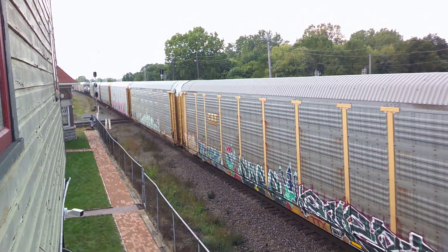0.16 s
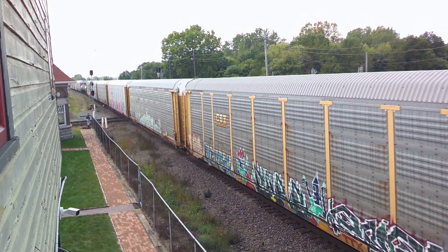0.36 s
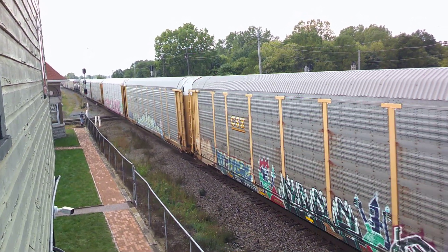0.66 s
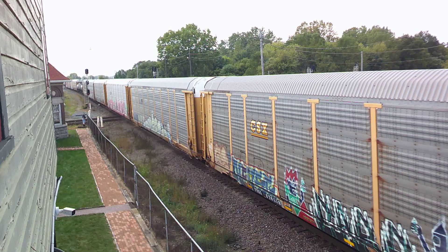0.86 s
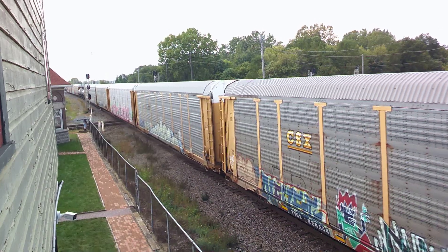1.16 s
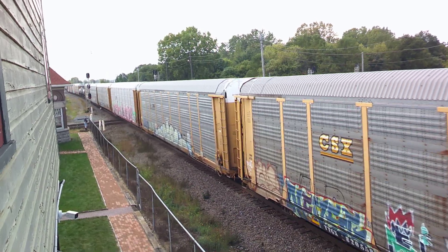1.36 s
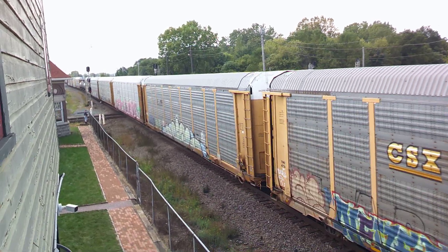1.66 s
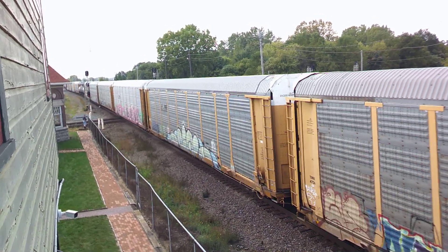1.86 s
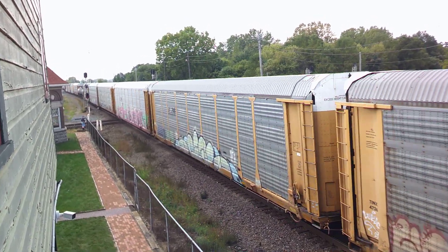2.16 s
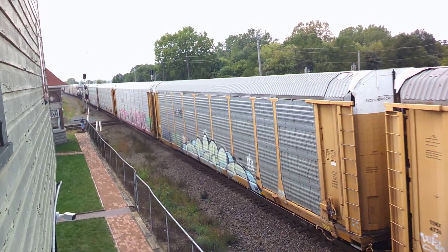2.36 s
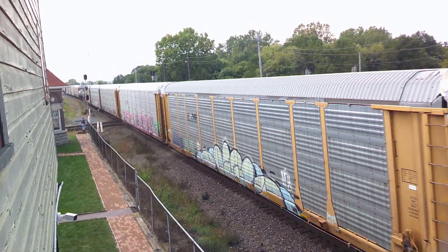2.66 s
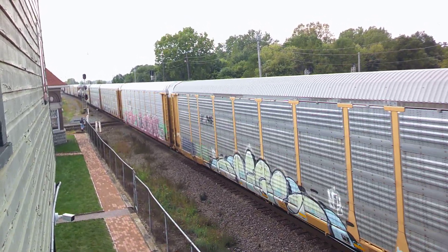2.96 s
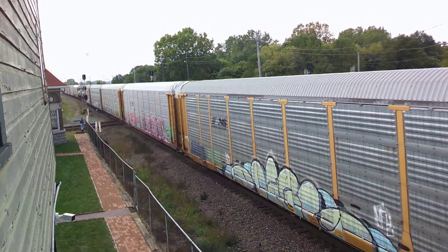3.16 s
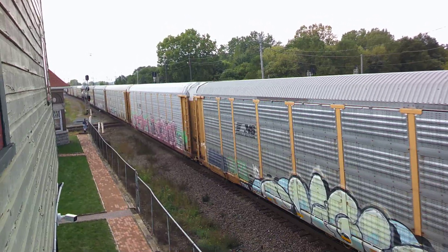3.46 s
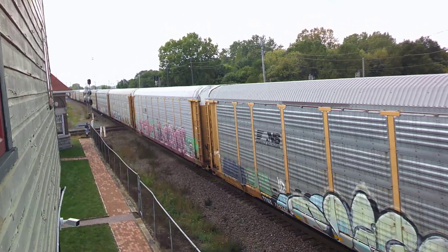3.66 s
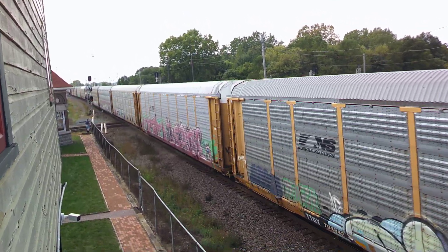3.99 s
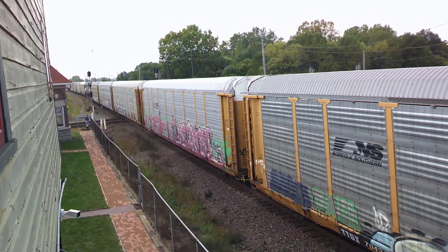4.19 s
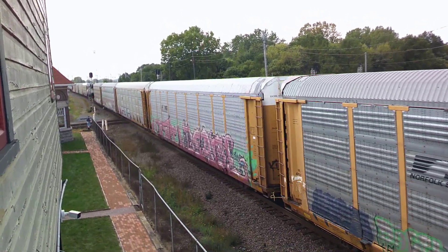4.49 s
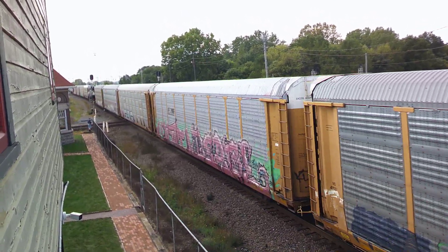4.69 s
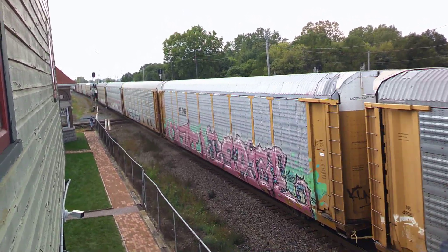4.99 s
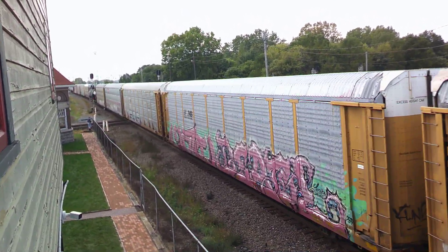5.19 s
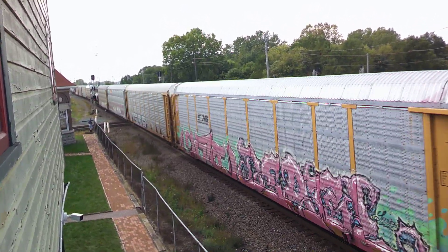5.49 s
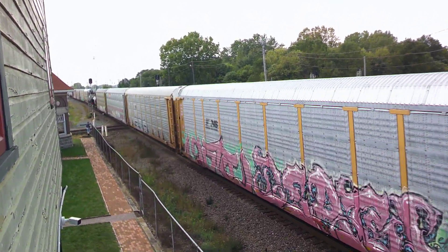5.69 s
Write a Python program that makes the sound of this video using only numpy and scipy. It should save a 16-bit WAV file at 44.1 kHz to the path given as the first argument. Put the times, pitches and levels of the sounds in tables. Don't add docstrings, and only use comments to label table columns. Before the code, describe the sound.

Loud, hard steel wheel blows come in uneven rhythmic bursts, ringing and rattling, with quieter clicks and rolling rumble in the gaps between bogies.

```python
import sys
import numpy as np
from scipy import signal
from scipy.fft import rfft, irfft
from scipy.io import wavfile
from scipy.ndimage import uniform_filter1d

SR = 44100
rng = np.random.default_rng(int(sys.argv[2]) if len(sys.argv) > 2 else 0)


def persist_wave(psi):
    counts = np.round(np.clip(psi, -1, 1) * 32767).astype(np.int16)
    wavfile.write(sys.argv[1], SR, np.atleast_2d(counts).T)


def elevation(decibels):
    levels = np.asarray(decibels, float)
    return 10 ** (levels / 20)


N = 257525
TIME = np.arange(N) / SR


def unit(x):
    return x / np.sqrt(np.mean(x ** 2))


def colour(x, points):
    hz, db = np.transpose(points)
    size = 2 ** 12
    grid_hz = np.maximum(np.arange(size // 2 + 1) * SR / size, 1)
    curve_db = np.interp(np.log(grid_hz), np.log(hz), db)
    cepstrum = irfft(np.log(elevation(curve_db)))
    cepstrum[1:size // 2] *= 2
    cepstrum[size // 2 + 1:] = 0
    response = irfft(np.exp(rfft(cepstrum)))
    response = response / np.sqrt(np.sum(response ** 2))
    return signal.fftconvolve(x, response)[:len(x)]


def walk(rate):
    k = int(SR / rate)
    steps = np.repeat(rng.standard_normal(N // k + 1), k)
    return unit(uniform_filter1d(uniform_filter1d(steps, k), k)[:N])


def knocks(spread_db, per_s):
    k = int(SR / per_s)
    size = elevation(spread_db * np.minimum(rng.exponential(size=N // k + 1), 2.5))
    loudness = uniform_filter1d(np.repeat(size, k)[:N], k)
    return unit(rng.standard_normal(N) * loudness)


def ring(x, hz, t60):
    pole = np.exp(2j * np.pi * hz / SR - np.log(1000) / (max(t60, .01) * SR))
    return signal.lfilter([1], [1, -pole], x).imag * np.sqrt(2 * (1 - abs(pole) ** 2))


def strikes():
    # time in seconds, clank level in dB, thud in dB above clank, wheel note in Hz,
    # trailing wheel in dB above the first.
    near_track = [(0.0144, -10, 0.5, 634, 11.5), (1.046, -5.5, -0.5, 516, 2.5),
                  (1.1861, -7.5, 6.5, 481, 3.5), (1.3768, 3.5, -9.5, 728, -13),
                  (1.684, -8.5, 1.5, 726, 3.5), (1.8381, 2, -1, 237, -4.5), (1.99, -2.5, 0, 475, -4.5),
                  (3.5411, -5, -2, 480, 1.5), (3.685, -6.5, 1.5, 670, 6.5), (3.836, -6.5, 2, 467, 8.5),
                  (4.395, -7, 4.5, 638, -1), (4.533, -5.5, 2.5, 262, 6), (4.6981, -3, 4, 270, -9),
                  (5.8219, -16, 3, 298, -10)]
    # [s, dB, dB, Hz, dB].
    far_track = [(0.0813, -22, -1.5, 439, -7.5), (0.1344, 0.5, -8, 493, -15.5),
                 (0.272, -5.5, 3.5, 328, 2.5), (0.428, -11.5, 5, 349, 3.5), (1.2514, -2, 2, 250, -10),
                 (1.462, -4.5, 1.5, 713, -8.5), (1.604, -4, 2.5, 490, 2), (2.0933, -11, 9.5, 480, -4.5),
                 (2.2308, -2.5, 2.5, 584, -2), (2.3899, -10, 8.5, 188, -17), (2.454, -19.5, 3, 320, 7),
                 (3.9406, -11.5, 1.5, 440, 3.5), (4.088, -11.5, 4.5, 780, 9.5),
                 (4.2535, -6.5, 4.5, 620, -15.5), (4.7964, -3.5, 1.5, 478, -7), (4.926, -10, 2.5, 760, 10),
                 (5.076, -16.5, 6, 235, 6)]
    # time in seconds, clank level in dB, thud in dB above clank, wheel note in Hz.
    joints = [(0.55, -12.5, -13.5, 467), (0.6087, -22.5, -5, 275), (0.6439, -20, -5, 268),
              (0.7237, -14.5, 2, 499), (0.7788, -23, 6, 490), (0.8517, -23, 4, 380), (0.9004, -22, 1, 401),
              (0.963, -24.5, 3.5, 375), (2.1434, -18, 8.5, 500), (2.5985, -18.5, -0.5, 189),
              (2.7452, -29.5, 7, 202), (2.885, -20, -6, 497), (3.0519, -19, 2.5, 480),
              (3.1098, -26, 6.5, 288), (3.203, -18, 3.5, 470), (3.3, -21.5, 1.5, 243),
              (3.3794, -23, -1.5, 468), (3.439, -20, 0.5, 313), (4.607, -30.5, 11, 520),
              (5.2195, -22.5, 3, 236), (5.3632, -23.5, 2, 214), (5.4946, -21.5, -2.5, 234),
              (5.6318, -15.5, -5.5, 272), (5.7863, -20, -10, 432)]
    rattle_db, trail_s, bounce_s = -18, 0.027, 0.03
    rows = [(s, db, thud_db, -15, 0.29, hz) for s, db, thud_db, hz in joints]
    for track, t60 in ((near_track, 0.23), (far_track, 0.21)):
        for s, db, thud_db, hz, trail_db in track:
            rows.append((s, db, thud_db, rattle_db, t60, hz))
            trail_hz = np.sqrt(hz * 480)
            rows.append((s + trail_s, db + trail_db, 2, -8, 0.24, trail_hz))
            bounce_db = db + max(trail_db, 0) - 14.5
            rows.append((s + trail_s + bounce_s, bounce_db, thud_db, rattle_db, t60, hz))
    return [row for row in rows if row[0] < TIME[-1]]


def shaking(db, shorter, lead_s=0., sudden=0.65, hold=0.85):
    rise_s = 0.0053 * sudden
    power = np.zeros(N)
    for (s, _, _, _, t60, _), peak_db in zip(strikes(), db):
        start = int((s - lead_s) * SR)
        t = TIME[:min(SR, N - start)]
        swell = 1 - np.exp(-t / max(rise_s, 1 / SR))
        fade_db = -60 * (t / max(t60 * shorter, .02)) ** hold
        power[start:start + len(t)] += (elevation(peak_db + fade_db) * swell) ** 2
    return np.sqrt(power)


def thud(heavy_db):
    # frequency in Hz, level in dB.
    thud_tone = [(40, -32.5), (90, -27.5), (160, -4.5), (260, -4.5), (400, -1.5), (480, 1.5), (650, -5.5),
                 (900, -5), (1300, -19), (2500, -34.5)]
    shake = shaking(heavy_db + 1.5, shorter=0.78, lead_s=0.0072, sudden=1.0, hold=1.51)
    return colour(shake * knocks(2.5, 150), thud_tone)


def ringing_steel(heavy_db):
    # mode frequency in Hz, level in dB, t60 in seconds.
    modes = [(129.7, -11, 0.064), (179, -12, 0.11), (228, 3.5, 0.08), (293, 3.5, 0.079), (325, 5.5, 0.072),
             (420, -0.5, 0.19), (468, 7, 0.14), (544, -25, 0.081), (602, -3, 0.13), (701, 8, 0.025),
             (786, 1.5, 0.049), (930, -14.5, 0.069), (1078, -4.5, 0.022)]
    push = shaking(heavy_db - 3.5, shorter=0.78, lead_s=0.0035, sudden=0.097)
    share = elevation(np.array(modes)[:, 1])
    out = np.zeros(N)
    for gain, (hz, _, t60) in zip(share, modes):
        turns = elevation(4.1 * walk(9))
        out += gain * ring(push * turns * knocks(0.87, 80), hz, t60)
    return out / np.sqrt(np.sum(share ** 2))


def clang(db):
    out = np.zeros(N + SR)
    t = TIME[:SR // 2]
    for (s, _, _, _, _, hz), peak_db in zip(strikes(), db):
        kick = 1.45 * np.exp(-t / 0.0011) * np.cos(2 * np.pi * hz * t)
        chatter = rng.standard_normal(len(t)) * np.exp(-t / 0.017)
        start = int((s - .001) * SR)
        out[start:start + len(t)] += elevation(peak_db) * ring(kick + chatter, hz, t60=0.037)
    return out[:N]


def clank(db):
    # frequency in Hz, level in dB.
    clank_tone = [(500, -44), (1000, 2), (1500, 6.5), (2000, -3), (3000, -5.5), (4000, -19), (5500, -21.5),
                  (9000, -20.5)]
    shake = shaking(db, shorter=0.43, sudden=0.9, hold=1.695)
    return colour(shake * knocks(2.2, 300), clank_tone)


def rattle(db):
    # frequency in Hz, level in dB.
    rattle_tone = [(3000, -16), (5000, -19), (6300, -7.5), (7400, -2.5), (8000, 5.5), (9500, -27)]
    shake = shaking(db, shorter=0.62, sudden=2.73, hold=1.59)
    return colour(shake * knocks(6.5, 350), rattle_tone)


def blows():
    _, clank_db, thud_db, rattle_db, _, _ = np.transpose(strikes())
    heavy_db = thud_db + 0.92 * (clank_db + 0.5)
    low = thud(heavy_db) + clang(heavy_db - 4.5) + ringing_steel(heavy_db)
    high = clank(clank_db - 4.5) + rattle(clank_db + rattle_db - 4.5)
    return low + high


def rolling():
    # time in seconds, roar level in dB.
    nearness = [(0.0, -7), (0.3, -11), (0.6, -14.5), (1.02, -20.5), (1.1, -10), (1.5, -11), (1.82, -8.5),
                (2.4, -9.5), (2.65, -16.5), (2.9, -17.5), (3.25, -16), (3.51, -19.5), (3.75, -10.5),
                (4.24, -12), (4.63, -12), (5.05, -11), (5.4, -17.5), (5.84, -19.5)]
    # frequency in Hz, level in dB per Hz.
    roar_tone = [(18, -50), (30, -62), (85, -14), (101, -5.5), (122, -0.5), (167, -5), (231, 3),
                 (315, -2.5), (779, -10.5), (1210, -22.5), (1720, -20), (3000, -39), (3900, -60),
                 (6600, -120)]
    # frequency in Hz, level in dB per Hz.
    hiss_tone = [(710, -28), (1200, -21), (1900, -2), (2150, -13), (2950, -13.5), (3710, -19.5),
                 (4130, -23), (4830, -28), (7290, -17), (8600, -16), (11200, -76), (18900, -120)]
    near_db = np.interp(TIME, *np.transpose(nearness))
    roar = colour(rng.standard_normal(N), roar_tone) * elevation(near_db + 2.0 * walk(16))
    hiss_db = -9 + 1.496 * near_db + 0.43 * walk(39)
    hiss = colour(knocks(0.82, 460), hiss_tone) * elevation(hiss_db)
    return roar + hiss


def echo(x, count=4):
    t60_s, top_hz, first_s = 1, 2740, .015
    t = TIME[:SR]
    out = np.zeros(N)
    for k in range(count):
        turn = np.cos(np.pi * (TIME / .9 + k / count)) ** 2
        tail = rng.standard_normal(SR) * elevation(-60 * t / t60_s) * (t > first_s)
        tail = signal.lfilter(*signal.butter(1, top_hz, fs=SR), tail)
        tail = tail / np.sqrt(np.sum(tail ** 2))
        out += signal.fftconvolve(x * turn ** 2, tail)[:N]
    return out


def scene():
    hits = blows()
    return (hits + elevation(-13) * echo(hits) + rolling())[None]


def low_pass(x):
    return signal.sosfilt(signal.butter(12, 15830, fs=SR, output="sos"), x)


def record(dry):
    mic_low_hz, band_hz = 83.7, 8070
    up, down = 160, 441
    overload, knee, ceiling = 0.72, 40, .717
    x = signal.sosfilt(signal.butter(3, mic_low_hz, "high", fs=SR, output="sos"), dry)
    band = signal.firwin(16001, band_hz, window=("kaiser", 8), fs=up * SR)
    x = signal.resample_poly(x, up, down, axis=1, window=band)
    x = x / (1 + np.abs(x / overload) ** knee) ** (1 / knee)
    x = signal.resample_poly(x, down, up, axis=1, window=band)[:, :N]
    x = np.clip(x, -ceiling, ceiling)
    return low_pass(x)


dry = scene()
out = record(dry)
persist_wave(out)
```